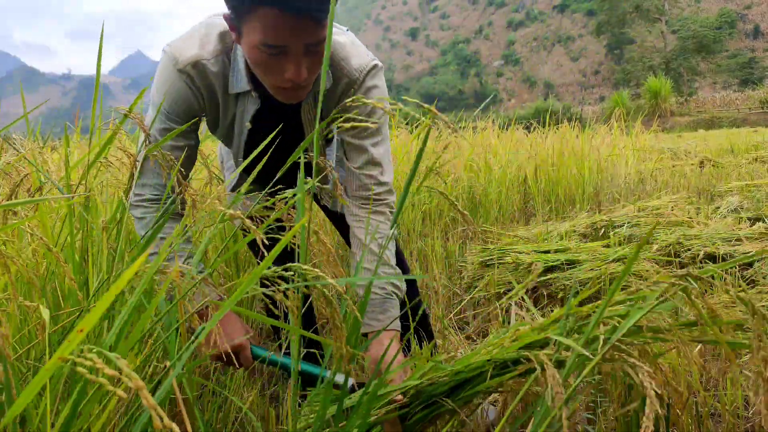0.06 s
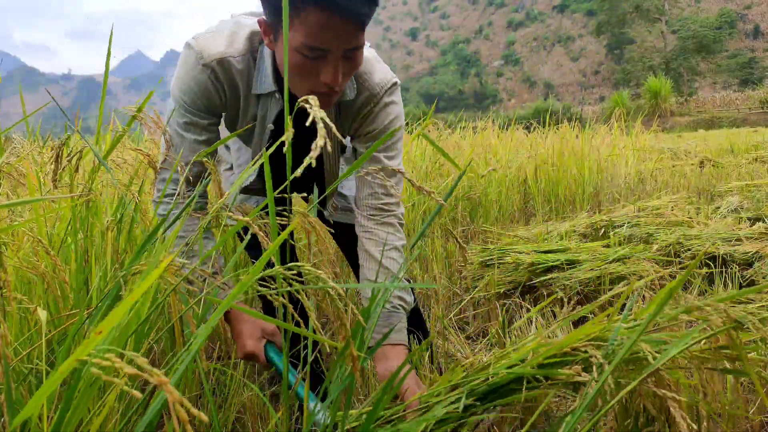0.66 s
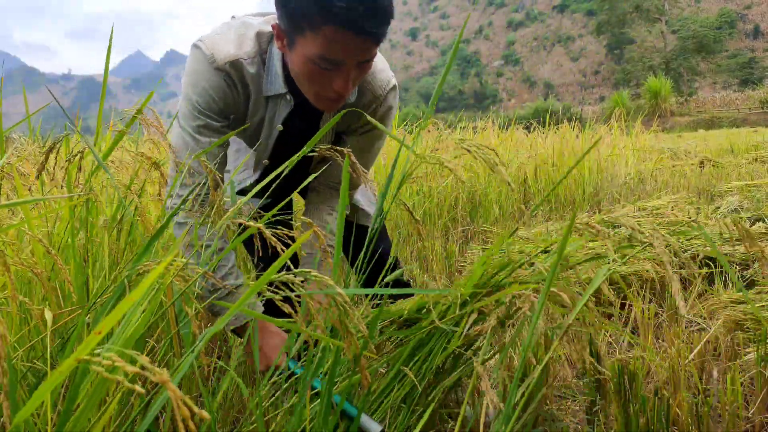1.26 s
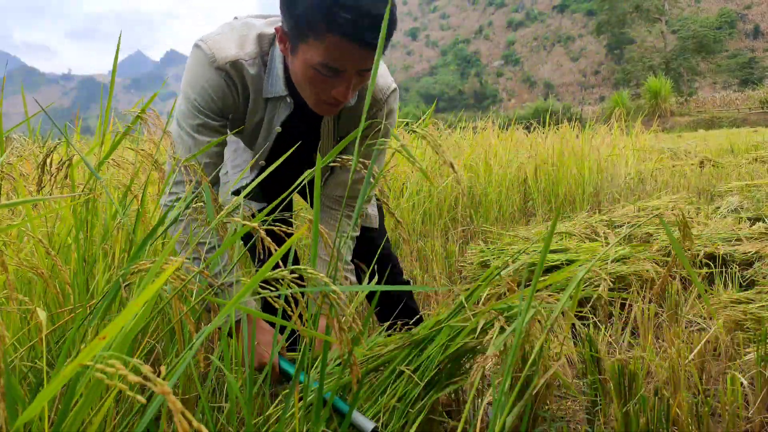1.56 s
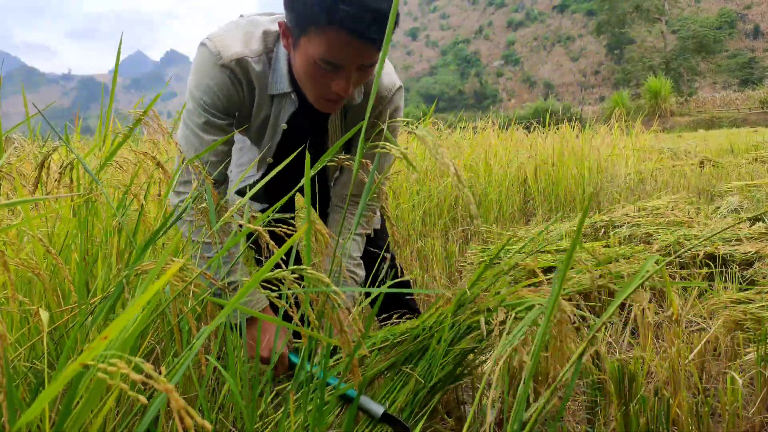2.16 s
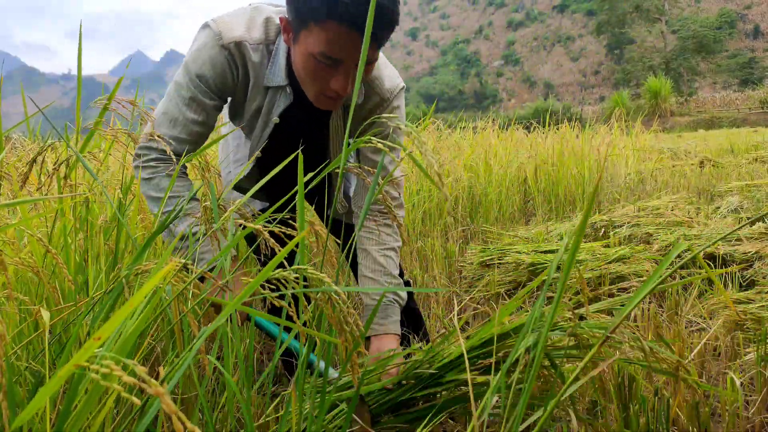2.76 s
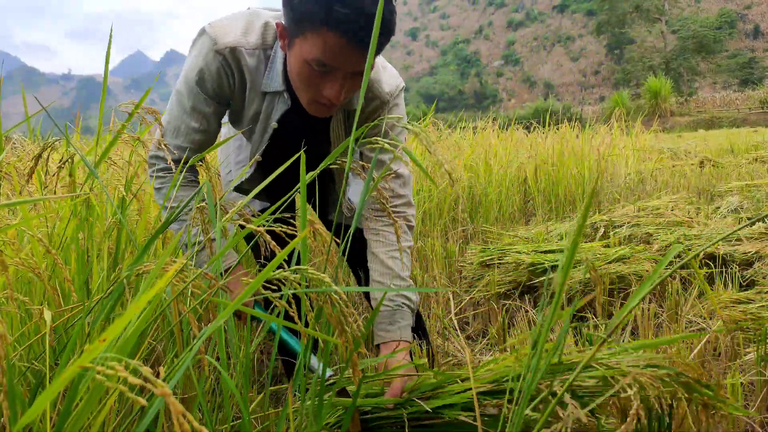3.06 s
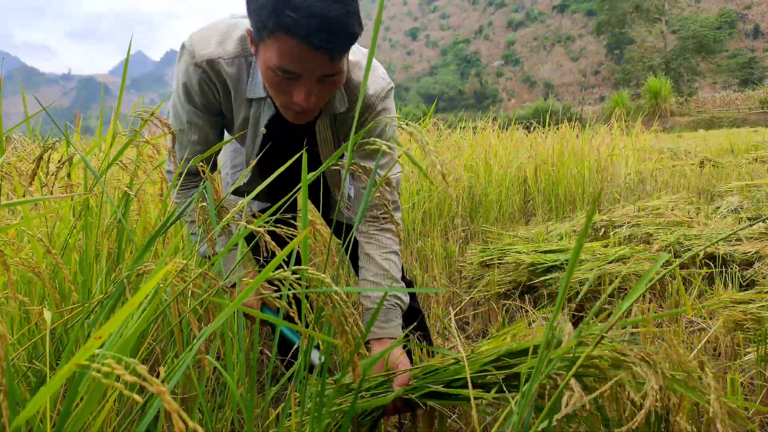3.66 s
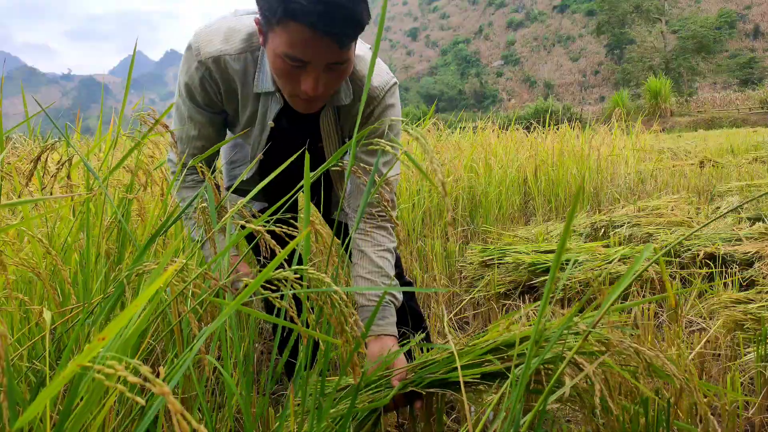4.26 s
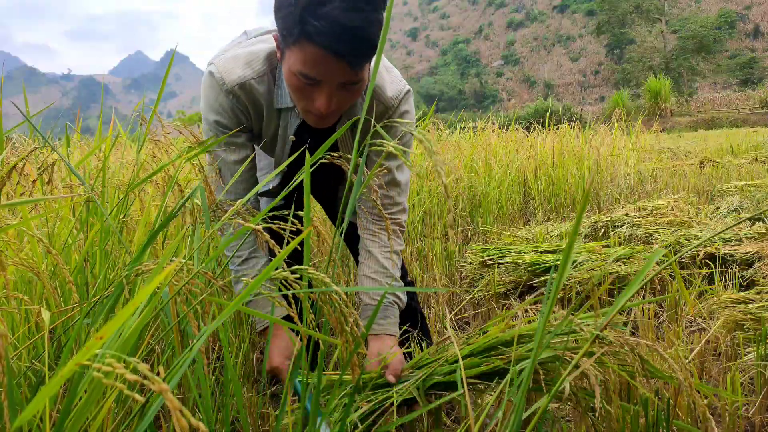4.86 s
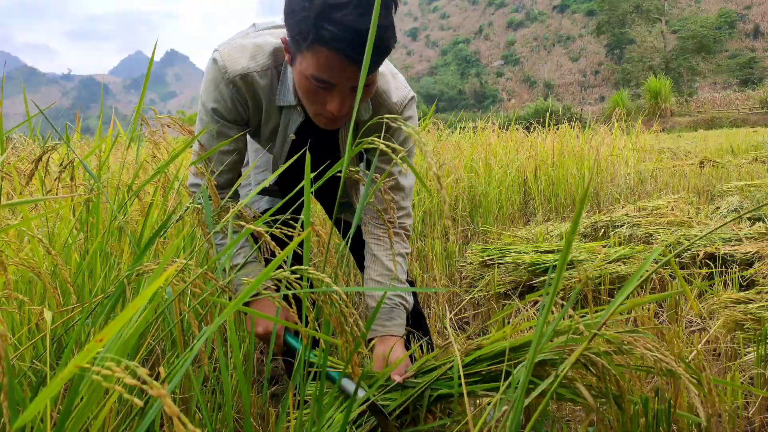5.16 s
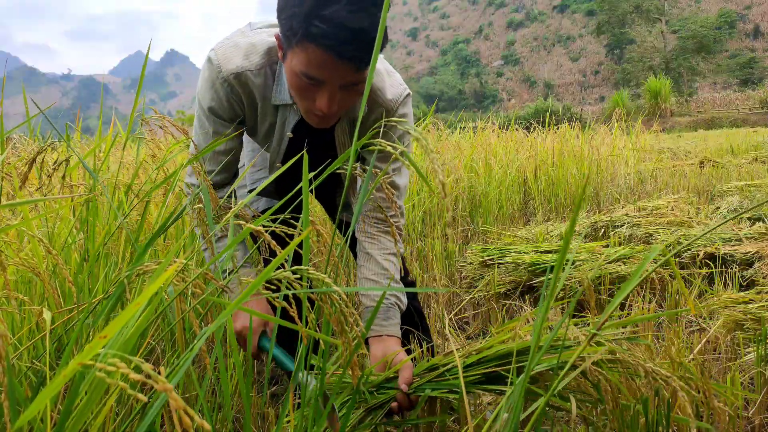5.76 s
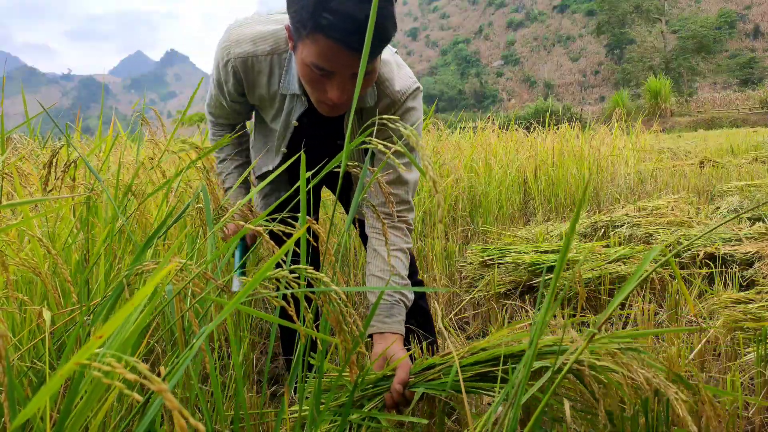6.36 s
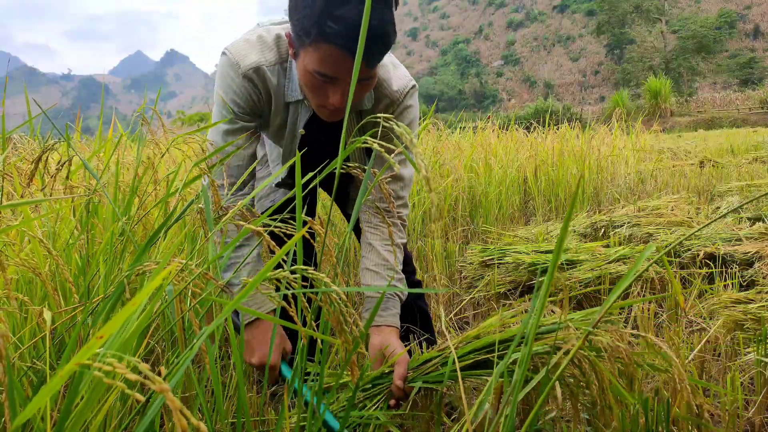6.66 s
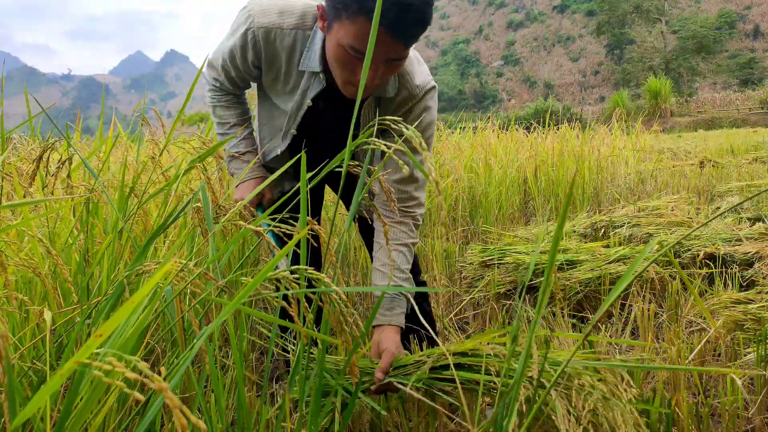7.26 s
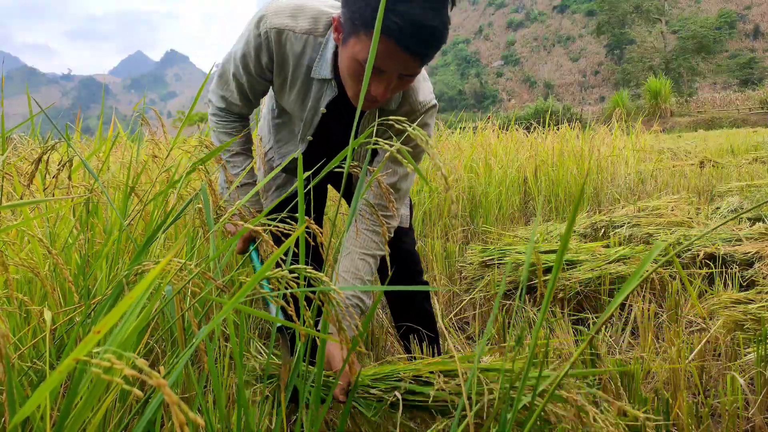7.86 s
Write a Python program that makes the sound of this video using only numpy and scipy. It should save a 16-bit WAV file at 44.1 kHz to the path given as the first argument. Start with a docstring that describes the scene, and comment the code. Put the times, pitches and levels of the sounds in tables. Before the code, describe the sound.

Leaves swish and dry rice stalks snap as someone gathers them, then a sickle rips through a handful in loud, crackling jerks.

```python
"""Cutting rice with a sickle

In an open field, a metre or two away, leaves swish and dry stalks crackle as a hand gathers them.
The toothed blade then rips through the handful in jerks, and stalk after stalk snaps.
These sounds are built mostly from tiny clicks. Behind them, light air rumbles at the two
microphones and a few faint, far calls drift in."""
import sys
import numpy as np
from scipy import signal
from scipy.fft import rfft, irfft, next_fast_len
from scipy.io import wavfile
from scipy.ndimage import uniform_filter1d, map_coordinates

SR = 44100
rng = np.random.default_rng(int(sys.argv[2]) if len(sys.argv) > 2 else 0)


def wav_record(signal):
    """Record a signal, one row per channel, as 16-bit PCM in the file named by sys.argv[1]."""
    frames = np.transpose(np.atleast_2d(signal))
    bounded = np.clip(frames, -1, 1)
    # unit amplitude maps onto the largest positive 16-bit level
    quanta = np.round(bounded * 32767).astype(np.int16)
    wavfile.write(sys.argv[1], SR, quanta)


N = 347949

# Tone colour (how strong each frequency is) of tearing fibres and of a dry crack: f/Hz, level/dB
TEAR_COLOUR = [(50, -51), (110, -9), (220, -3.5), (400, 0.5), (700, -5.5), (1300, -16), (2500, -5),
               (6000, -49)]
CRACK_COLOUR = [(200, -22), (1000, -6), (2200, -2.5), (4200, -7), (6000, -1), (8500, 0), (12000, -4),
                (15500, -2)]


def blade(force):
    """The teeth catch and slip through the bundle, tearing thick fibres in uneven jerks."""
    # about 170 slips a second; each starts at once and dies away in a few milliseconds
    slips = (rng.random(N) < 170 / SR) * amp(2 * rng.standard_normal(N))
    jerks = .5 + signal.lfilter([1], [1, -np.exp(-1 / (.0022 * SR))], slips)
    fibres = clicks(N, rate=1200, scatter_db=5.5, spread_ms=.036, diffuse=.16, lead_ms=-.017)
    teeth = clicks(N, rate=700, scatter_db=1.2, spread_ms=.025, diffuse=.15, lead_ms=-.07)
    tearing = amp(-1.5) * unit(colour(fibres, TEAR_COLOUR) * jerks) * pan_right(.5)
    sawing = amp(13) * unit(colour(teeth, CRACK_COLOUR) * jerks) * pan_right(2)
    return force * (tearing + sawing)


# Each pull of the blade: start t/s, length/s, relative level/dB
PULLS = [(6.061, 0.055, -45), (6.118, 0.029, -43.5), (6.889, 0.039, -38), (6.931, 0.048, -36.5),
         (7.014, 0.042, -36), (7.098, 0.012, -37.5), (7.121, 0.014, -39.5)]


def pull_force(bite_s=.0038, let_go_s=.027, slack_s=.12, slack_db=-4.5):
    """The force on the blade: each pull bites, holds and lets go."""
    t = np.arange(N) / SR
    force = np.zeros(N)
    for start, length, db in PULLS:
        bite = np.clip((t - start) / bite_s, 0, 1)
        after = np.maximum(t - start - length, 0)
        last_fibres = amp(slack_db) * np.exp(-after / slack_s)  # still tearing as the bundle comes away
        let_go = np.maximum(np.exp(-after / let_go_s), last_fibres)
        force = np.maximum(force, amp(db) * bite * let_go)
    return force


def thin_stalks(gap_s=.013, scatter_db=4, splinter_s=.011):
    """Thinner stalks give way one by one during a pull; returns rows like those of LOUD_SNAPS."""
    rows = []
    for start, length, db in PULLS:
        for k, (late, size) in enumerate(rng.uniform(-.76, 1, size=(8, 2))):
            delay = (k + 1 + .42 * late) * gap_s
            level = db + scatter_db * size
            if delay < length:
                rows.append((start + delay, level + 17, level - 3, splinter_s))
    return rows


# The loudest stalks breaking: t/s, relative crack level/dB, relative knock level/dB, splintering/s
LOUD_SNAPS = [(0.0828, -13, -58, 0.005), (0.2035, -18, -46, .014), (0.262, -24, -44, 0.033),
              (0.3688, -22, -59, 0.011), (.713, -21, -52, .01), (.841, -14, -59, 0.0055),
              (0.8896, -22, -43, .016), (1.116, -22, -48, .01), (1.18, -25, -46, 0.016),
              (1.194, -12, -54, .016), (1.389, -17, -45, .014), (1.6776, -17, -40, .018),
              (1.717, -22, -45, 0.014), (2.5406, -21, -48, .016), (2.5495, -18, -40, .03),
              (2.6492, -16, -49, 0.013), (2.7018, -17.5, -44.5, 0.021), (3.0098, -20, -48, 0.0065),
              (3.207, -12, -47, .035), (3.287, -19, -36, 0.0084), (3.294, -10, -32, .028),
              (3.304, -13, -43, 0.022), (3.5259, -16, -46, 0.015), (3.5508, -12, -43, 0.016),
              (4.8274, -25, -50, 0.017), (4.942, -15, -55, .014), (5.066, -12, -56, 0.04),
              (5.1527, -24, -51, 0.018), (5.2714, -25, -55, .014), (5.289, -9, -47, 0.079),
              (5.5842, -14, -62, .016), (5.772, -21, -41.5, .04), (6.0585, -2.5, -31, 0.013),
              (6.0774, -6, -31, 0.034), (6.0995, -10, -29.5, .02), (6.1288, -8, -21, 0.017),
              (6.1416, -9, -36, .008), (6.2074, -21, -41, .012), (6.7588, -17, -46, .008),
              (6.7632, -6, -43, .012), (6.778, -11, -35.5, .014), (6.8765, -6, -31, 0.035),
              (6.8934, 8.5, -24, 0.021), (6.9004, 1, -31, 0.0092), (6.913, -9, -26, 0.025),
              (6.9366, -8, -24, 0.014), (6.947, -4, -30, .014), (6.956, -1, -31, 0.014),
              (6.963, -2, -30, .01), (6.9733, -5, -38, 0.0073), (6.9835, -8, -24.5, 0.014),
              (7.0075, -2, -30.5, 0.016), (7.0115, -14, -29, .012), (7.0225, -.5, -26, .014),
              (7.031, -11, -24, .014), (7.0362, 0, -23.5, 0.015), (7.043, -4, -26, .012),
              (7.0494, 0, -33, 0.0078), (7.058, -15, -30, 0.011), (7.071, -11, -30, .012),
              (7.098, -6, -30, .016), (7.104, -18, -30, 0.015), (7.1123, -5, -37, .006),
              (7.1315, -11, -28, 0.025), (7.14, -10, -37, .012), (7.666, -21, -65, .016),
              (7.7331, -22, -38, 0.018)]
# Tone colour of a knock on a hollow stem: f/Hz, level/dB
KNOCK_COLOUR = [(60, -16), (110, -1.5), (170, -7), (240, 4.5), (330, -.5), (430, 3.5), (800, -4.5),
                (1500, -0.5), (3000, -12.5), (7000, -45)]


def snaps(crack_gain_db=7.5, knock_gain_db=21.5, ring_db=-6):
    """A stalk breaks with one sharp crack and a spray of splinters, and its hollow stem knocks."""
    n = SR // 16
    out, t = np.zeros((2, N + n)), np.arange(n) / SR
    for start, crack_db, knock_db, length in list(LOUD_SNAPS) + thin_stalks():
        splinters = clicks(n, rate=4000, scatter_db=2, spread_ms=.04, diffuse=.2, lead_ms=-.05)
        splinters = unit_energy(splinters * amp(-60 * t / length))
        jolts = clicks(n, rate=3000, scatter_db=2, spread_ms=.03, diffuse=.1, lead_ms=-.04)
        jolts = unit_energy(jolts * amp(-60 * t / (length + .004)))
        # the first break reaches the right microphone two samples before the left
        splinters[[0, 1], [2, 0]] += .32
        jolts[[0, 1], [2, 0]] += .55
        # no two stalks sound alike
        own_colour = [(hz, db + 1.5 * rng.standard_normal()) for hz, db in CRACK_COLOUR]
        crack = unit_energy(colour(splinters, own_colour))
        knock = unit_energy(colour(jolts, KNOCK_COLOUR)) + amp(ring_db) * stem_ring(jolts)
        snap = amp(crack_db + crack_gain_db) * crack + amp(knock_db + knock_gain_db) * knock
        out[:, round(start * SR):][:, :n] += snap
    return out[:, :N] * pan_right(1.1)


def stem_ring(jolts, typical_hz=1990, scatter_octaves=.465, ring_s=.016):
    """The jolts of splintering make a hollow stem ring briefly at its own pitch."""
    t = np.arange(jolts.shape[1]) / SR
    hz = typical_hz * 2 ** (scatter_octaves * rng.standard_normal())
    ring = np.sin(2 * np.pi * hz * t) * amp(-60 * t / ring_s)
    return unit_energy(signal.fftconvolve(jolts, [ring], axes=1)[:, :len(t)])


# The flat of the blade sliding on stems: start t/s, length/s, centre f/Hz, width/Hz, level/dB
BLADE_SLIDES = [(4.967, 0.13, 2600, 900, -49), (5.11, 0.15, 2240, 900, -44), (6.123, .03, 2140, 600, -34),
                (6.753, 0.036, 1460, 450, -40.5), (6.9, .1, 2200, 900, -32.5),
                (7.005, 0.075, 1900, 1200, -35), (7.723, 0.033, 1980, 800, -40)]


def scrapes():
    """Steel slides along a stem, which rasps in one narrow band of frequencies."""
    out, t = np.zeros((2, N)), np.arange(N) / SR
    friction = clicks(N, rate=710, scatter_db=4.5, spread_ms=.015, diffuse=.18)
    spectrum = rfft(friction, 2 * next_fast_len(N // 2 + 1))
    hz = np.linspace(0, SR / 2, spectrum.shape[1])
    for start, length, centre_hz, width, db in BLADE_SLIDES:
        resonance = 1j * hz * width / (centre_hz ** 2 - hz ** 2 + 1j * hz * width)
        rasp = irfft(spectrum * resonance ** 2)[:, :N]
        swell = np.sin(np.pi * np.clip((t - start) / length, 0, 1))
        out += amp(db) * swell * unit(rasp)
    return out


# Tone colours of rubbing leaves and of crackling stalks: f/Hz, level/dB
LEAF_COLOUR = [(500, -46.5), (2000, -4), (4100, -9.5), (5500, -4.5), (7500, -2), (10000, -4), (12500, -6),
               (14200, -3.5), (15500, -1.5)]
STALK_COLOUR = [(100, -36), (250, -17), (400, -10.5), (700, -4.5), (1200, -3.5), (2200, -5), (3100, -1),
                (4100, -13), (6000, -12), (15000, -17.5)]


def gathering(force):
    """Leaves slide over each other in a swish; stiff stalks crackle in clumps under hand and blade."""
    leaf_gain, stalk_gain = hand_sweeps()
    leaf_gain = np.hypot(leaf_gain, amp(9.5) * force)  # a pull also shakes the leaves
    stalk_gain = np.hypot(stalk_gain, amp(2.5) * force)  # and splits the stalks
    catching = wobble(70)  # a flutter that swish and crackle share
    leaves = clicks(N, rate=7000, scatter_db=.5, spread_ms=.055, diffuse=1, lead_ms=.012)
    stalks = clicks(N, rate=1500, scatter_db=2, spread_ms=.05, diffuse=.85, lead_ms=.018)
    leaves = shimmer(colour(leaves, LEAF_COLOUR), depth_db=1.56, window=512)
    leaves = shimmer(leaves, depth_db=3, window=2048)
    swish = amp(5) * leaf_gain * unit(leaves * amp(.5 * catching + .15 * wobble(200)))
    stalks = shimmer(colour(stalks, STALK_COLOUR), depth_db=3, window=1024)
    crackle = amp(3.5) * stalk_gain * unit(stalks * amp(.94 * catching + .56 * wobble(180)))
    return (swish + crackle + husk_ticks(leaf_gain)) * amp(.23 * wobble(16))


# Hands moving through the crop: peak t/s, rise/s, fall/s, relative swish level/dB, crackle offset/dB
HAND_SWEEPS = [ (0.03, .2, 0.71, -39, -8), (0.265, 0.028, 0.028, -42, -4), (0.52, 0.16, 0.43, -40, -11),
               (0.73, 0.21, 0.42, -37.5, -12), (0.89, 0.044, 0.26, -39.5, -6), (1.16, 0.14, 0.29, -39, -10),
               (1.39, 0.089, 0.44, -40, -8), (1.79, 0.14, 0.18, -36.5, -8.5), (2.22, 0.21, 1, -41, -9.5),
               (2.56, 0.14, 0.24, -33.5, -10.5), (2.68, 0.076, 0.22, -36.5, -9),
               (3.015, 0.1, 0.28, -36, -9), (3.17, 0.025, 0.14, -47.5, -6), (3.21, .02, 0.068, -41, -5),
               (3.30, 0.016, 0.034, -38, -10), (3.50, 0.17, 0.22, -41.5, -8), (3.65, 0.15, 0.21, -38, -11),
               (3.79, 0.06, 0.057, -44, -2.5), (4.07, 0.14, 0.098, -48, -2.5), (4.32, 0.04, 0.076, -50, -6),
               (4.42, 0.066, 0.031, -52, -15), (4.75, 0.081, .1, -52, -9), (4.85, 0.038, .08, -41, -8),
               (4.94, 0.073, 0.19, -38, -12), (5.05, 0.079, 0.087, -35.5, -12),
               (5.17, 0.044, 0.31, -41, -7.5), (5.295, 0.055, 0.14, -37, -10),
               (5.55, 0.11, 0.29, -39, -12.5), (5.78, 0.056, 0.11, -42, -5.5),
               (5.97, 0.056, 0.14, -44.5, -4), (6.145, 0.14, 0.048, -33, -10), (6.54, 0.25, 0.45, -44, -11),
               (6.774, 0.012, 0.099, -31, -8), (6.885, 0.027, 0.046, -27, -12),
               (7.04, 0.13, 0.11, -27.5, -12), (7.28, 0.1, 0.28, -37.5, -8), (7.738, 0.012, 0.05, -33, -7),
               (7.87, 0.086, .3, -35, -7.5)]


def hand_sweeps():
    """Loudness curves for swish and crackle: each sweep swells smoothly, then the plants settle."""
    t = np.arange(N) / SR
    leaf_power, stalk_power = amp(-54) ** 2, amp(-59.5) ** 2  # the crop never quite stops rustling
    for peak, rise, fall, db, crackle_db in HAND_SWEEPS:
        swell = np.exp(-np.where(t < peak, ((t - peak) / rise) ** 2, (t - peak) / fall))
        power = (amp(db) * swell) ** 2
        leaf_power += power
        stalk_power += power * amp(crackle_db) ** 2
    return np.sqrt(leaf_power), np.sqrt(stalk_power)


def shimmer(x, depth_db, window):
    """Random patches of the spectrum swell and fade, so the rustle's colour shimmers."""
    slices = signal.stft(x, nperseg=window)[2]  # a big window makes the patches narrow and long
    patches = uniform_filter1d(rng.standard_normal(slices.shape[1:]), size=3, axis=0)  # over frequency
    patches = uniform_filter1d(patches, size=9, axis=1)  # over time
    return signal.istft(slices * amp(depth_db * unit(patches)), nperseg=window)[1][:, :N]


def husk_ticks(leaf_gain):
    """Dry husks tick, growing louder with the swish up to a limit."""
    ticks = colour(clicks(N, rate=45, scatter_db=2.2, spread_ms=.05, diffuse=0), CRACK_COLOUR)
    return np.minimum(leaf_gain, amp(-29)) * amp(-12.5) * unit(ticks)


# Thin dry stems springing free: t/s, f/Hz, level/dB, time to fade by 60 dB/s
STEM_PINGS = [(0.2035, 8000, -27, .012), (0.8896, 2400, -36, .014), (1.18, 2780, -29, .016),
              (1.389, 3180, -30, .016), (2.5495, 1900, -32, .014), (3.2078, 3200, -30, .014),
              (3.287, 1800, -28, .008), (4.6685, 6300, -28, .006), (4.808, 8400, -34, .025)]


def pings():
    """A stem slips past its neighbour and pings; the wave is shifted a little at each microphone."""
    out, t = np.zeros((2, N + SR)), np.arange(SR // 16) / SR
    for start, hz, db, fade_s in STEM_PINGS:
        shift_s = rng.uniform(-1, 1, (2, 1)) * .00003
        tone = np.sin(2 * np.pi * hz * (t + shift_s))
        attack = 1 - np.exp(-t * hz)
        out[:, round(start * SR):][:, :len(t)] += amp(db - 60 * t / fade_s) * attack * tone
    return out[:, :N]


def stubble(loudest_db=-57.5):
    """A firm sweep bends the thick, hollow stem bases, which crunch dully; a light one barely does."""
    _, stalk_gain = hand_sweeps()
    bend = np.minimum(stalk_gain / amp(-45), 1)
    crunch = colour(clicks(N, rate=260, scatter_db=3.5, spread_ms=.029, diffuse=.17), KNOCK_COLOUR)
    return amp(loudest_db) * bend ** 2 * unit(crunch)


# Faint calls from far away: start t/s, length/s, start f/Hz, end f/Hz, level/dB
DISTANT_CALLS = [(4.335, 0.11, 520, 545, -63), (4.41, 0.19, 440, 465, -64), (4.4, 0.305, 1665, 1620, -62.5),
                 (7.652, .14, 805, 765, -51.5)]


def far_calls():
    """Thin tones slide a little up or down, blurred by the distance."""
    out, t = np.zeros(N), np.arange(N) / SR
    for start, length, start_hz, end_hz, db in DISTANT_CALLS:
        progress = np.clip((t - start) / length, 0, 1)
        hz = start_hz + (end_hz - start_hz) * progress
        phase = 2 * np.pi * np.cumsum(hz) / SR + .91 * wobble(60)
        out += amp(db + 3.1 * wobble(30)) * np.sin(np.pi * progress) * np.sin(phase)
    return out


# Tone colours of the breeze and of the valley's hush: f/Hz, level/dB
BREEZE_COLOUR = [(20, -23), (35, -8), (56, -5.5), (75, -1), (110, -1.5), (170, -5), (280, -12), (500, -19),
                 (1500, -47)]
HUSH_COLOUR = [(100, -8), (200, -26), (300, -26), (420, -20), (750, -3), (1150, -6), (2500, -2.5),
               (6000, -41), (15000, -26)]
# How loud the hush is over time: t/s, level/dB
HUSH_LEVELS = [(0, -61.5), (3.9, -60), (4.3, -64), (4.6, -67), (4.9, -62.5), (5.6, -63), (6.6, -65),
               (7.9, -61)]


def air():
    """Light air rumbles mostly at the right microphone, over the soft hush of the valley."""
    rumble = unit(colour(rng.standard_normal((2, N)) + .53 * rng.standard_normal(N), BREEZE_COLOUR))
    hush = unit(colour(rng.standard_normal(N) + .7 * rng.standard_normal((2, N)), HUSH_COLOUR))
    breeze = amp(-57.5 + 1.5 * wobble(6)) * rumble * pan_right(4.25, centre_db=-.25)
    hush_db = np.interp(np.arange(N) / SR, *np.transpose(HUSH_LEVELS))
    return breeze + amp(hush_db) * hush


# Bands that each microphone's opening boosts or dips: centre f/Hz, width/Hz, level change/dB
LEFT_MIC = [(6620, 2140, 10.5), (9200, 2000, -3), (15100, 1800, 3)]
RIGHT_MIC = [(8310, 2840, 10.5), (15200, 2100, -2)]


def colour(x, tone_colour, size=4096):
    """Give a stereo sound a tone colour, plus the boosts and dips of each microphone."""
    hz = np.fft.rfftfreq(size, 1 / SR)
    table_hz, table_db = np.transpose(tone_colour)
    source_db = np.interp(np.log(hz + 1), np.log(table_hz), table_db)
    mic_db = np.array([sum(db / (1 + (2 * (hz - centre) / width) ** 2) for centre, width, db in mic)
                       for mic in (LEFT_MIC, RIGHT_MIC)])
    # build a filter that rings only after a click, never before it (minimum phase)
    cepstrum = irfft(np.log(amp(source_db + mic_db)))
    cepstrum[:, 1:size // 2] *= 2
    cepstrum[:, size // 2 + 1:] = 0
    response = irfft(np.exp(rfft(cepstrum)))
    return signal.oaconvolve(x, response, axes=1)[:, :x.shape[1]]


def clicks(n, rate, scatter_db, spread_ms, diffuse, lead_ms=0):
    """Tiny breaks, rate a second, each from its own direction; a positive lead reaches the left first."""
    sign, strength, direction = rng.standard_normal((int(rate * n / SR) + 1, 4)).T[:3]
    when = rng.uniform(0, n, len(sign))
    size = np.sign(sign) * amp(scatter_db * np.clip(strength, -3, 2.3))
    lag = (lead_ms + direction * spread_ms) * SR / 1000
    arrivals = [np.round(when + side * lag / 2).astype(int) % n for side in (-1, 1)]
    direct = np.array([np.bincount(at, size, n) for at in arrivals])
    # the crop all around scatters some of the sound, differently to each microphone
    return unit(unit(direct) + diffuse * rng.standard_normal((2, n)))


def wobble(rate):
    """A smooth curve through rate random points a second."""
    return map_coordinates(rng.standard_normal(int(N * rate / SR) + 4), [np.arange(N) * rate / SR])


def pan_right(db, centre_db=0):
    """Left and right gains, db below and db above centre_db."""
    return amp([[centre_db - db], [centre_db + db]])


def amp(db):
    """Turn decibels into a gain to multiply by."""
    return 10 ** (np.asarray(db) / 20)


def unit(x):
    """Scale a sound so that its average power is 1."""
    return x / np.sqrt(np.mean(x ** 2) + 1e-20)


def unit_energy(x):
    """Scale a short sound so that its total energy is 1."""
    return x / np.linalg.norm(x)


def scene():
    """The harvester's work in the open air, with all sounds added together."""
    force = pull_force()
    return (gathering(force) + blade(force) + scrapes() + far_calls() + air()
            + stubble() + snaps() + pings())


def record(dry, ceiling=.88, top_hz=15650):
    """The camera rounds off the tallest peaks and drops the very highest frequencies."""
    rounded = dry / (1 + (dry / ceiling) ** 6) ** (1 / 6)
    size = next_fast_len(N + SR // 2)
    kept = np.fft.rfftfreq(size, 1 / SR) < top_hz
    return irfft(rfft(rounded, size) * kept, size)[:, :N]


dry = scene()
out = record(dry)
wav_record(out)
```